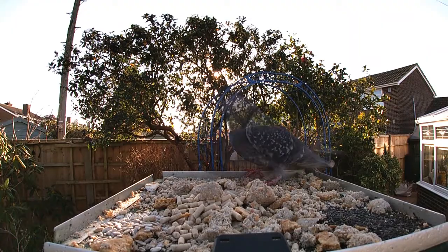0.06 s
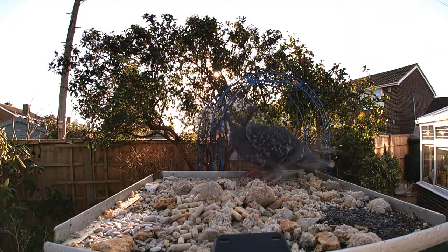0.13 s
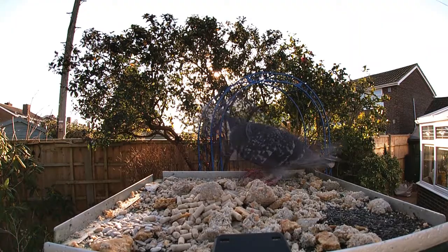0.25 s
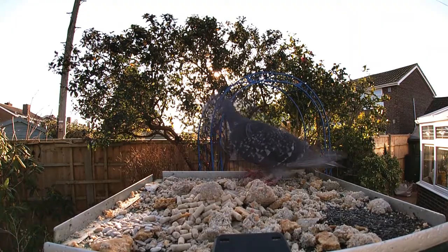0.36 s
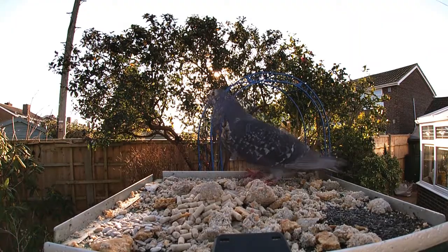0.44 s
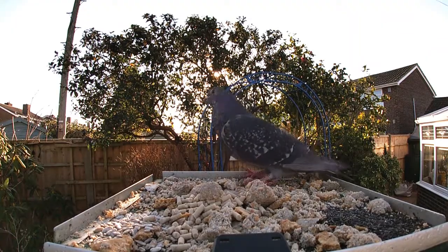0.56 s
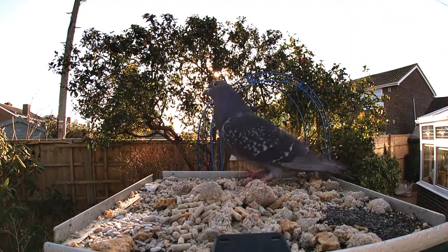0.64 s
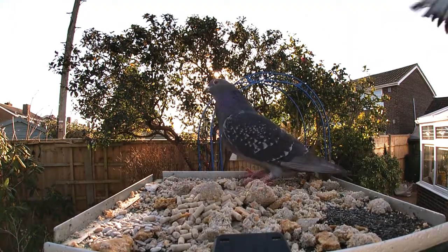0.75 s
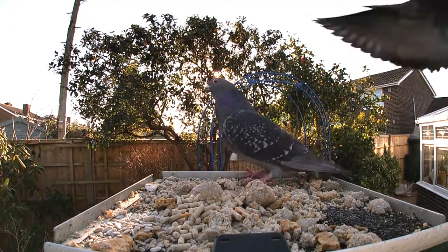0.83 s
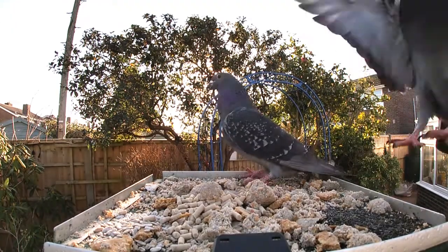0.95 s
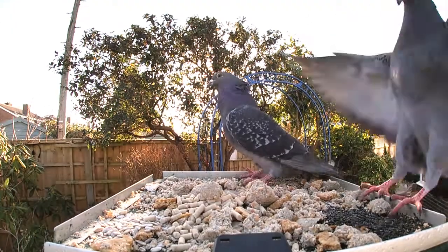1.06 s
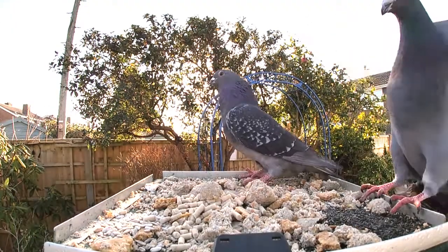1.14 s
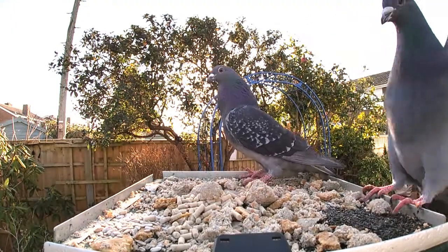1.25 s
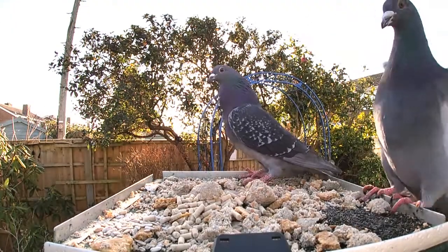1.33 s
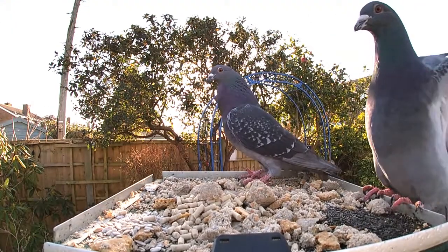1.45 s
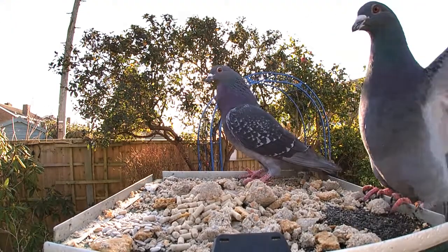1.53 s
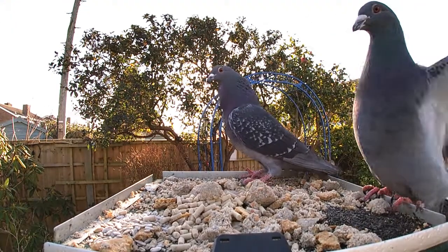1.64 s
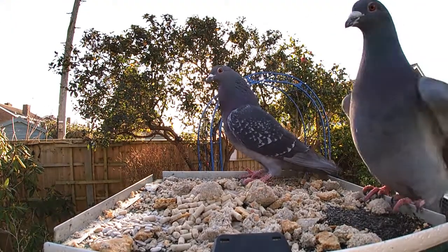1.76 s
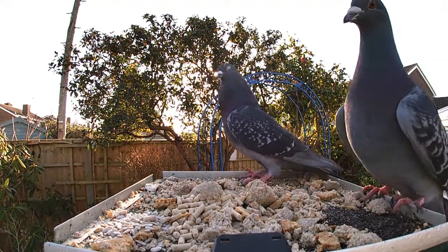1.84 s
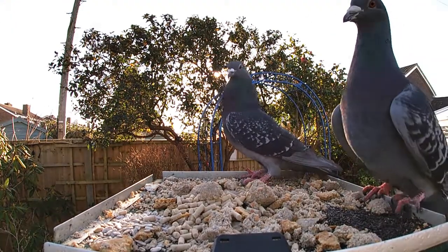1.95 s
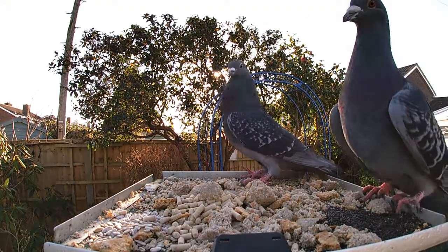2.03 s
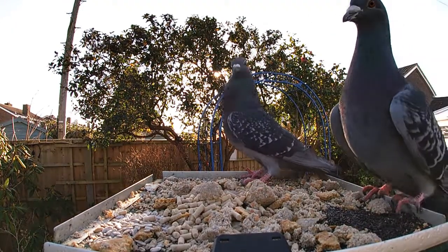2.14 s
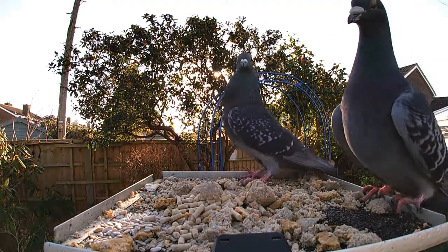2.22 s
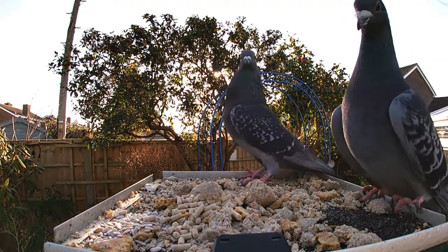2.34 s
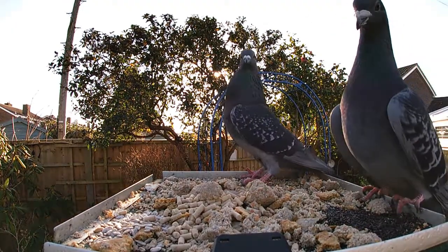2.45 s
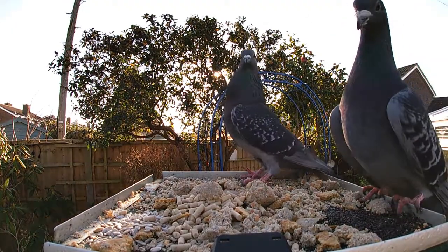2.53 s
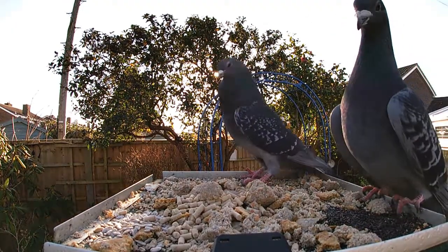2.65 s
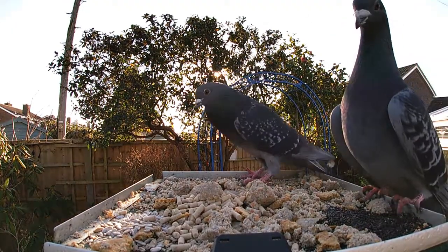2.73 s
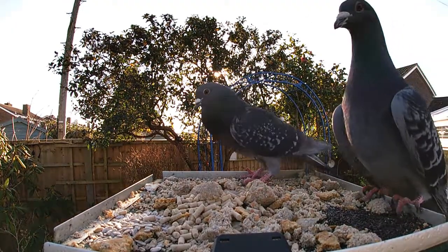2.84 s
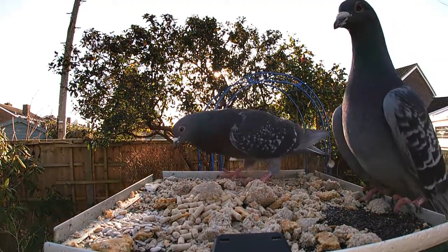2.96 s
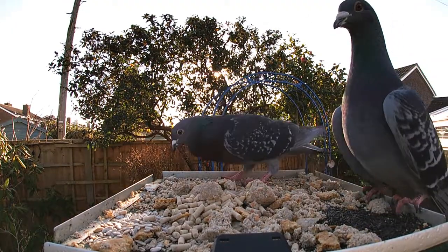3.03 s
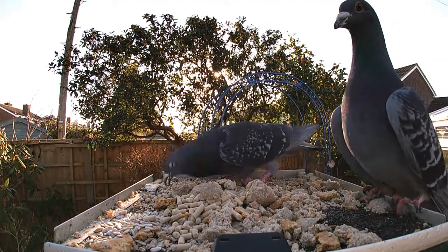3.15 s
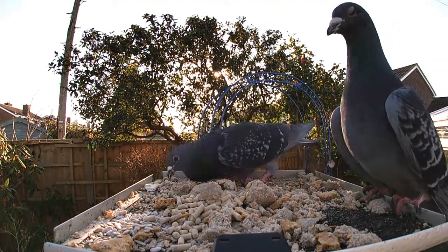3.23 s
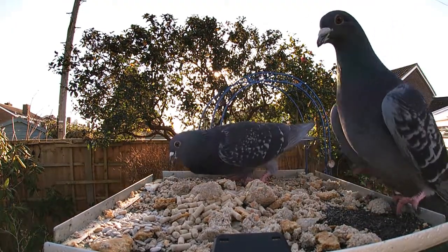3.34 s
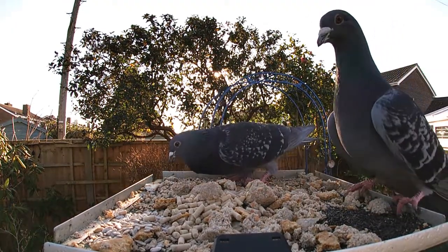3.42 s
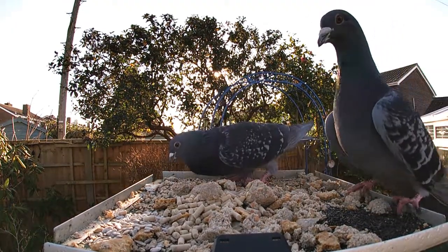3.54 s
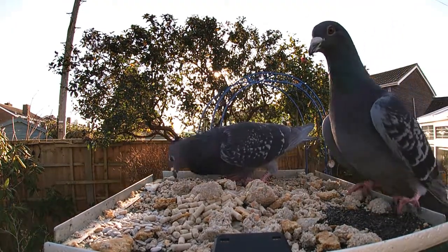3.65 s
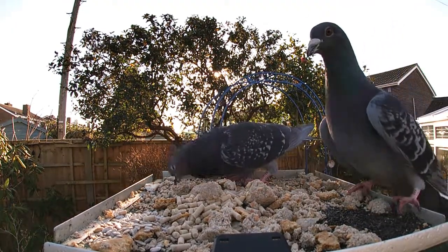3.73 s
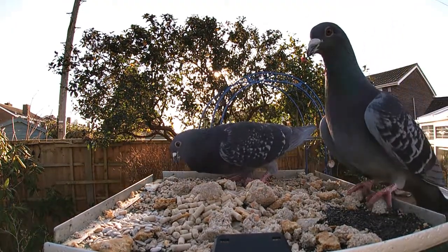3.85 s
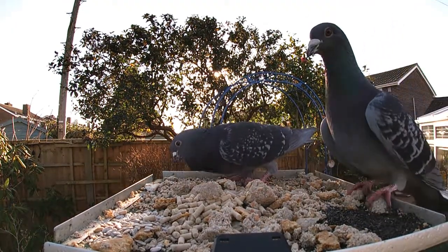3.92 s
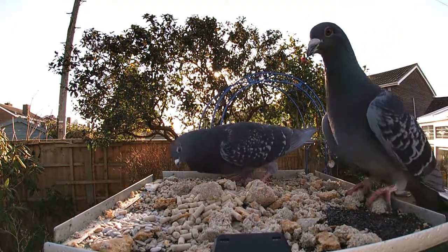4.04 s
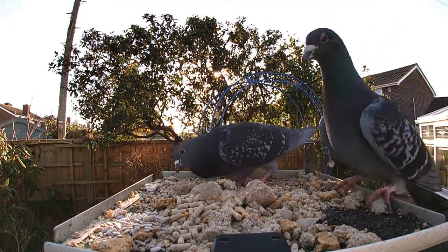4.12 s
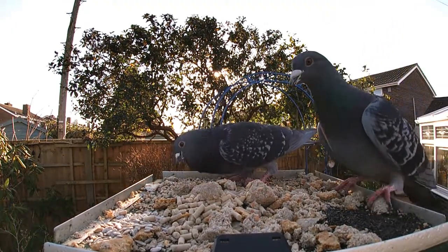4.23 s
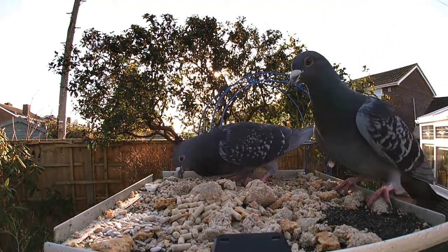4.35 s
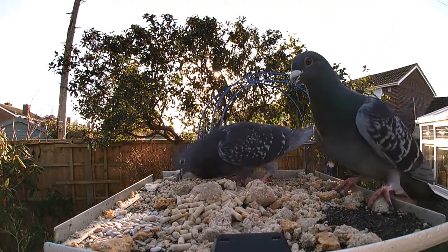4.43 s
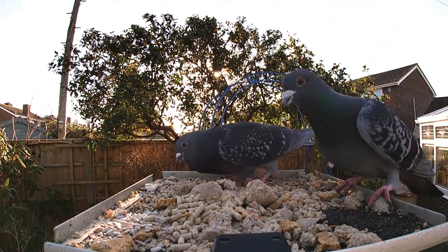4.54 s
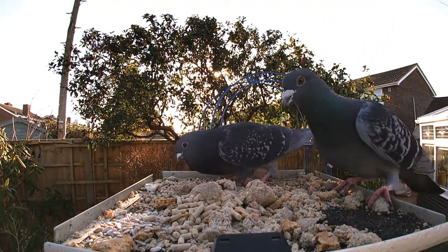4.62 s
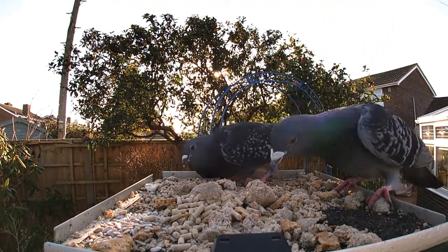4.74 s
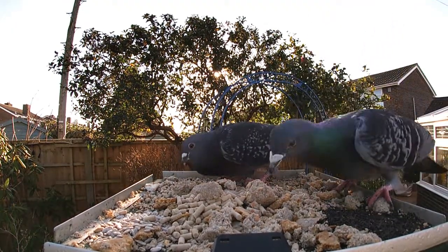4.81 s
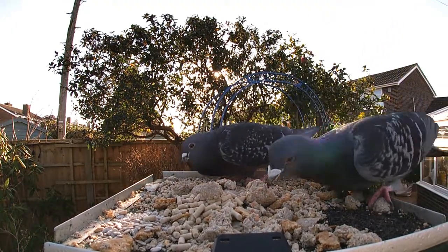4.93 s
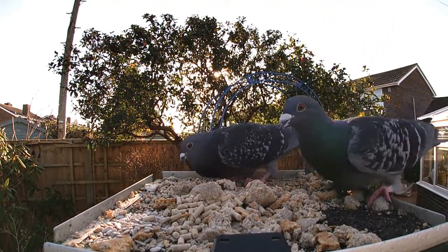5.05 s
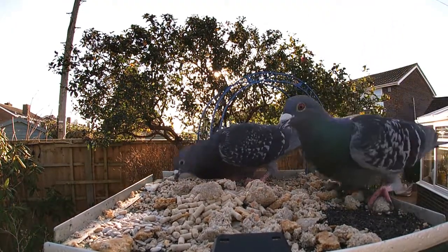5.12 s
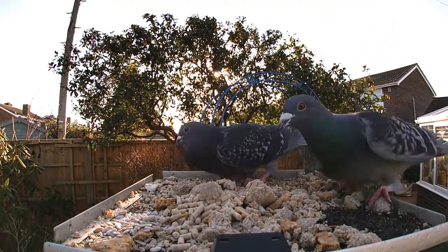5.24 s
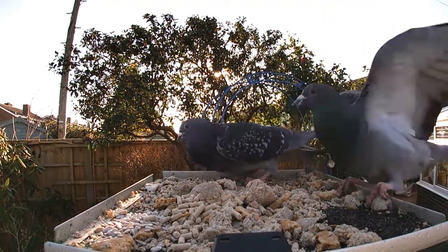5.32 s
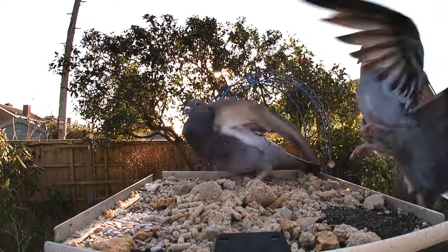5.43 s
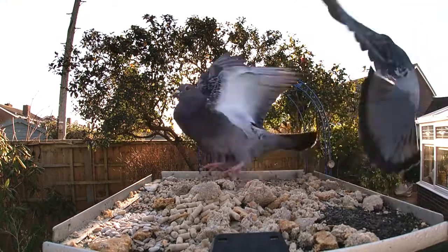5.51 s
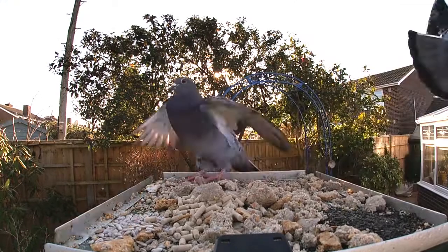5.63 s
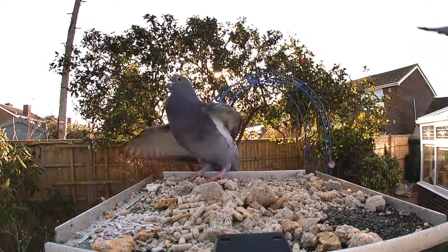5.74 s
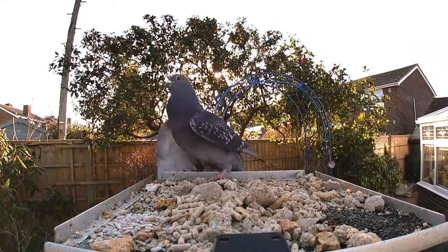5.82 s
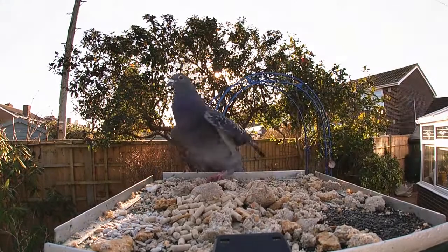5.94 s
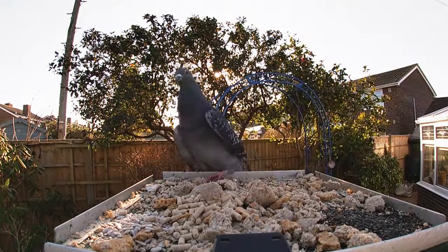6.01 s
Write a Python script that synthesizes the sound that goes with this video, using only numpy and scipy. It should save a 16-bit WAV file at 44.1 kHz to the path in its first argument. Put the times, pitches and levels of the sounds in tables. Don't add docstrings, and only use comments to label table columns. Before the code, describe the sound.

Outdoors in a garden, with the microphone right on a feeding tray: a pigeon's landing flaps grow louder and thump the microphone, then stop. Sparrow-like cheeps, thin whistles and a distant buzzy trill emerge with soft breeze and traffic hum. Sparse footfalls, claw ticks and one hard peck come next, before clattering wings take off, thudding the wood and spilling loose seed.

```python
import sys
import numpy as np
from scipy import signal
from scipy.io import wavfile
from scipy.ndimage import uniform_filter1d

SR = 44100
rng = np.random.default_rng(int(sys.argv[2]) if len(sys.argv) > 2 else 0)


def gain_from_decibels(decibels):
    exponent = np.asarray(decibels, float) / 20
    return 10 ** exponent


def materialize(psi):
    bounded = np.clip(np.atleast_2d(psi).T, -1, 1)
    quanta = np.round(bounded * 32767).astype(np.int16)
    wavfile.write(sys.argv[1], SR, quanta)


N = 267951

# frequency in Hz, level in dB per Hz.
HUM_SPECTRUM = [(60, -40), (115, -10.5), (165, 0.5), (250, -3.5), (705, -17.5), (1500, -26.5), (2200, -33),
                (3600, -33.5), (5200, -33.5), (6500, -43.5), (8000, -60.5), (15500, -88)]
# time in seconds, depth in dB.
DUCKS = [
    (-.01, 8.5),
    (1.45, 17),
    (3.7, 2.6),
    (4.35, 2.2),
    (5.8, 9),
]
OPEN_DB, CLAMP_S, RECOVER_S = -49.5, .3, .9
# peak in seconds, peak in dB, rise and fall in seconds per 20 dB.
WIND = [
    (1.25, -32.5, 1.1, .2),
    (1.7, -61, 3., 3.),
    (2.26, -38, .13, 1.3),
    (3.45, -39.5, .8, 1.1),
    (4.0, -43, .7, .8),
    (5.2, -39, 2.4, .5),
    (5.6, -25.5, .5, .35),
    (5.86, -37, .3, .1),
    (6.0, -58, .3, .9),
]
# time in seconds, peak in dB, frequency in Hz, half length in seconds.
GUSTS = [
    (2.35, -26, 66.1, 0.043),
    (4.017, -35.5, 62.4, .05),
    (5.346, -36.5, 74.8, .07),
]

# start and length in seconds, first and last Hz, level in dB rms.
WHISTLES = [(.3, .055, 7520, 7530, -55), (.325, .045, 5940, 6200, -57), (.385, .04, 7500, 7690, -58),
            (.685, .045, 4830, 4810, -56), (.775, .21, 4450, 4280, -46), (1.155, .12, 7500, 7250, -53),
            (1.26, .06, 5560, 5540, -67), (1.51, .15, 2600, 2650, -58), (1.51, .03, 3560, 3500, -59),
            (1.755, .045, 2180, 2180, -61), (2.1, .29, 9300, 7000, -82), (3.055, .035, 3520, 2550, -50),
            (4.0, .23, 5740, 5830, -62), (4.65, .17, 4370, 4300, -65), (4.775, .09, 2300, 2300, -57),
            (5.09, .05, 4300, 5020, -62), (5.01, .03, 4400, 5200, -62), (2.86, .09, 7400, 7350, -72),
            (2.945, .05, 4450, 5250, -49), (3.615, .055, 5600, 4300, -46), (3.665, .04, 4300, 5200, -55),
            (3.72, .07, 5300, 5150, -58), (3.845, .045, 2830, 2860, -56), (.41, .025, 2950, 2800, -54),
            (.635, .05, 3450, 3650, -50), (2.631, .015, 5950, 6300, -62), (2.853, .016, 6750, 6900, -62),
            (2.94, .06, 4500, 4620, -56), (3.138, .03, 5200, 5250, -50), (2.815, .035, 3300, 3250, -66),
            (3.0, .06, 3850, 3750, -53), (4.495, .15, 5470, 5350, -61), (4.67, .04, 5420, 5350, -61),
            (4.93, .03, 2300, 2350, -61), (3.51, .06, 5950, 5100, -46), (3.7, .09, 2750, 2750, -70),
            (4.43, .2, 5990, 6000, -63), (4.52, .04, 4000, 3950, -59), (4.39, .05, 4300, 4300, -62)]
# start in seconds, pitch in Hz, level in dB rms.
TRILL_STEPS = [(1.56, 3050, -57), (1.6, 3250, -54), (1.618, 4250, -57), (1.63, 3600, -55),
               (1.67, 3800, -53), (1.715, 4600, -57), (1.745, 3650, -56), (1.81, 4250, -58),
               (1.85, 4550, -57), (1.928, 3650, -57)]
# start and length in seconds, first and last Hz, level in dB rms.
QUAVERS = [
    (.583, .106, 2950, 3350, -38),
    (.02, .11, 8000, 7900, -58),
]
# start and length in seconds, first and last Hz, level in dB rms.
WARBLES = [(.411, .065, 5700, 3930, -43), (.445, .055, 5100, 4900, -47), (.472, .04, 5000, 3250, -44),
           (2.62, .05, 2900, 3750, -54), (2.7, .1, 4500, 4880, -49), (3.152, .09, 5800, 5100, -44),
           (2.995, .045, 5250, 5000, -55)]
# start and length in seconds, first and last Hz, level in dB rms.
SWOOPS = [(.579, .012, 4500, 2800, -42), (1.468, .042, 3300, 2280, -62), (.689, .034, 4300, 3720, -42),
          (.724, .032, 4200, 3700, -41), (2.666, .03, 3000, 4150, -53), (3.295, .12, 8900, 6850, -62),
          (3.555, .065, 3500, 4700, -46), (3.81, .04, 2000, 2750, -63)]
# start and length in seconds, first and last Hz, level in dB rms.
DROPS = [(2.105, .057, 7700, 5000, -82), (2.08, .05, 4000, 2870, -59), (3.47, .06, 6150, 5750, -60),
         (3.6, .062, 4700, 4150, -58), (4.55, .048, 3950, 3100, -63), (.735, .065, 3380, 3250, -46),
         (2.385, .03, 7500, 6000, -74)]
# start and length in seconds, first and last Hz, level in dB rms.
SLIDES = [(2.643, .016, 6900, 5200, -64), (2.686, .03, 7750, 5300, -66), (2.771, .011, 6700, 5200, -68),
          (2.818, .024, 7400, 5200, -64), (2.87, .032, 7300, 5200, -66), (4.63, .08, 6000, 5300, -63),
          (4.985, .025, 6500, 3500, -66), (4.975, .05, 7800, 7500, -76), (4.275, .04, 6600, 4300, -67),
          (4.355, .025, 3800, 5000, -64), (3.51, .06, 7500, 6900, -72), (3.015, .025, 3900, 2900, -54)]
# start and length in seconds, foot and top in Hz, level in dB rms.
ARCHES = [(.438, .036, 1800, 2480, -46), (1.698, .04, 1800, 2250, -55), (2.327, .035, 4500, 6800, -70),
          (2.203, .018, 5000, 6000, -70), (2.99, .03, 3300, 3900, -52), (3.062, .02, 2600, 3500, -54),
          (2.15, .035, 2700, 3310, -61), (2.975, .065, 3050, 4260, -47), (3.45, .12, 6900, 7520, -72),
          (3.495, .045, 3700, 5900, -43), (3.93, .05, 3400, 5400, -53), (4.022, .036, 3550, 4480, -53),
          (4.51, .055, 2900, 3900, -55), (4.733, .04, 1800, 2430, -49), (4.59, .03, 2800, 3700, -62)]
# time in seconds, centre and swing in Hz, level in dB rms.
TRILL = [
    (1.53, 2900, 250, -64),
    (1.57, 3200, 400, -55),
    (1.62, 3600, 600, -52.5),
    (1.69, 3910, 600, -50),
    (1.76, 3950, 600, -56),
    (1.85, 3900, 550, -57.5),
    (1.93, 3900, 550, -58),
    (2.06, 3700, 500, -63),
]
# peak in seconds, peak in dB, rise and fall in seconds per 20 dB.
TWITTER = [
    (.1, -66, .3, .2),
    (1.31, -65, .2, .13),
]
STEP_S, STEP_RISE = .03, 1.02
SWOOP_BEND, WARBLE_BEND, DROP_BEND, SLIDE_BEND, ARCH_BEND = 2.6, 8., 3.6, 1.5, 2.8
SHAKE_HZ, SHAKES_PER_S = 140, 58
FADE_DB, WARBLE_FADE_DB = -5, -3
FLOCK_HZ, FLOCK_SPREAD, FLOCK_DB, FLOCK_COUNT = 5700, .06, -15, 280

# time in seconds, # air
# push peak in dB, feather swish in dB.
STROKES = [(.06, -40, -53.5), (.187, -31.5, -51.5), (.312, -28, -46.5), (.441, -22, -41.5),
           (.566, -13.5, -39), (.684, -12, -38.5), (.754, -36, -51.5), (.794, -10, -35), (.864, -30, -45.5),
           (.915, -10, -37), (.99, -34, -44), (1.022, -9.5, -36), (1.059, -9, -56), (1.111, -10.5, -39),
           (1.147, -11, -42), (1.172, -5, -48), (5.475, -11, -35), (5.518, -8.5, -37), (5.543, -10.5, -41)]
# frequency in Hz, level in dB per Hz.
SWISH_SPECTRUM = [(260, -10.5), (378, -2), (1020, -5.5), (1910, -11.5), (3340, -13.5), (4960, -17),
                  (6360, -15), (7620, -22.5), (10400, -29.5), (13800, -44), (15500, -60)]
# peak in seconds, peak in dB, rise and fall in seconds per 20 dB.
RUSTLE = [
    (1.04, -60, 1.5, .08),
    (1.14, -57, .08, .08),
    (1.216, -64, .04, .02),
    (1.26, -77, .1, .1),
    (3.89, -79, .06, .15),
    (4.86, -75, .05, .17),
    (5.32, -65, .07, .5),
    (5.45, -52, .1, .16),
    (5.565, -60, .15, .13),
    (5.9, -85, .5, .45),
]
# time in seconds, low lump in dB, rattle in dB,
# fade in seconds per 20 dB.
BUFFETS = [(1.095, -21, -28.5, 0.05), (1.115, -28, -28.5, 0.02), (1.156, -16, -24, 0.0367),
           (1.165, -17, -17.5, 0.0376), (1.183, -17.5, -21.5, 0.045), (1.228, -33.5, -41, 0.08),
           (1.28, -36, -64, .1), (2.3, -52, -56, .1), (5.478, -26, -25.5, .03), (5.5, -23, -28, .05),
           (5.518, -21, -16.5, 0.0452), (5.535, -23, -21, 0.0349), (5.56, -22, -19, .04),
           (5.583, -19, -26, .04), (5.61, -24, -44, .06), (5.635, -24, -43, 0.04), (5.705, -26, -42, 0.03),
           (5.73, -20, -42, 0.02), (5.775, -30, -53, 0.02), (5.835, -36, -53, .1), (5.885, -38, -54.5, .07)]
# frequency in Hz, level in dB per Hz.
RATTLE_SPECTRUM = [(120, -16), (270, 3), (400, -2), (800, -12.5), (1500, -21.5), (3000, -37.5), (5000, -63),
                   (9000, -100)]
SOFT_PUSH_S, HARDEN_S_PER_DB = .036, .0003

# frequency in Hz, width in Hz, level in dB.
TRAY_MODES = [(1510, 135, 5), (1010, 170, -1.5)]
# frequency in Hz, width in Hz, level in dB.
SEED_MODES = [(2630, 640, 10.5), (4300, 630, 2)]
# frequency in Hz, width in Hz, level in dB.
BRIGHT_MODES = [(6200, 300, 4), (9700, 1600, -15.5)]
# time in seconds, peak in dB, scrape length in seconds.
QUILLS = [(.0676, -40.5, .0044), (1.0973, -33, .003), (1.1992, -36, .004), (1.4144, -57, .0054),
          (1.507, -45, .0035), (3.3922, -40.5, .0029), (3.464, -47, .004), (3.838, -48, .004),
          (3.885, -37, .0045)]
# time in seconds, peak in dB, scrape length in seconds.
SEEDS = [(2.0064, -42, .0049), (2.4076, -38, .0047), (2.428, -44.5, .004), (2.442, -46, .0044),
         (2.9696, -30, .0079), (3.0574, -37, .004), (3.089, -40, .0045), (3.4366, -33.5, .0064),
         (4.2378, -35, .0029), (4.4846, -34.5, .0035), (5.6128, -29, .0051), (5.6276, -34, .003),
         (5.649, -31, .0026), (5.696, -37.5, .0035), (5.731, -32, .004), (5.7546, -20.5, .004),
         (5.795, -42, .004), (5.824, -39, .0075), (5.836, -35, .0071), (5.878, -34, .0064),
         (5.9048, -38, .0062), (6.022, -42, .0052)]
# time in seconds, peak in dB, scrape length in seconds.
CLAWS = [(3.2515, -35, .011), (3.7984, -40, .0055), (4.1463, -40, .011), (4.458, -41, .008),
         (4.768, -37, .012), (5.011, -45, .0045), (5.2134, -35, .016), (5.2747, -37, .0029),
         (5.328, -33, .003), (5.8625, -39, .0086)]
# time in seconds, peak in dB, scrape length in seconds, tray ring in dB,
# bright ring in dB.
SLAPS = [
    (4.1807, -21.5, .0016, -30, -21),
    (5.4217, -23.5, .008, -4, -14),
    (5.4274, -20, .0055, 7, -19),
    (5.473, -17, .003, -8, -20.5),
    (5.4905, -30, .004, 8, -4),
    (5.4956, -16, .004, 6, 3),
    (5.5166, -16, .005, -3, -30),
]
SEED_DB, CLAW_DB, QUILL_DB = (-20, -38), (-1, -27), (-8, -12)
# time in seconds, peak in dB, frequency in Hz, overtone in dB.
STEPS = [
    (2.014, -38.5, 318, -13),
    (2.821, -35.5, 219, -18),
    (3.4345, -21.5, 300, 3),
    (3.4425, -24, 255, -8),
    (3.426, -35, 370, 8),
    (3.891, -28, 280, -18),
    (4.179, -36, 336, -15),
    (4.149, -35, 330, -18),
]

# time in seconds, peak in dB, frequency in Hz,
# scrape length in seconds.
PINGS = [(1.0965, -26, 4600, .003), (1.0965, -33, 6700, .002), (1.199, -34, 3100, .002),
         (1.325, -56, 2300, .002), (1.355, -56, 3700, .002), (1.381, -57, 4400, .002),
         (3.086, -54, 6800, .003), (3.103, -59, 6800, .003), (3.68, -50, 2800, .003),
         (3.754, -60, 6800, .004), (3.836, -62, 9500, .005), (3.869, -50, 6200, .006),
         (3.901, -48, 6900, .004), (5.29, -55, 9700, .006), (5.312, -51, 9700, .004),
         (5.4055, -44, 9800, .002), (5.4269, -35, 9900, .008), (5.4269, -53, 13500, .008),
         (5.4738, -26, 9800, .006), (5.4738, -42, 13800, .004), (5.4735, -23, 4300, .001),
         (5.481, -32, 2300, .006), (5.517, -20, 1900, .004), (5.461, -28, 1450, .005),
         (5.503, -20, 1500, .008), (5.429, -22, 1000, .012), (5.428, -26, 4200, .008),
         (4.263, -43, 700, .004), (5.49, -36, 10000, .003), (5.49, -52, 13500, .003),
         (5.4958, -31, 9700, .003), (5.5172, -33, 9300, .003), (5.5285, -54, 13500, .001),
         (5.534, -48, 11500, .001), (5.571, -52, 11000, .001), (5.613, -43, 9800, .002),
         (5.627, -26, 2450, .003), (5.771, -42, 3000, .003), (5.795, -42, 3300, .004),
         (5.808, -50, 6000, .005), (5.835, -35, 2400, .008), (5.906, -39, 3100, .01),
         (5.968, -48, 2800, .004), (6.07, -46, 2500, .004)]
# time in seconds, peak in dB, frequency in Hz.
THUDS = [(1.087, -22, 230), (1.157, -3, 120), (1.1815, -12, 210), (1.191, -13, 230), (5.4735, -12, 520),
         (2.3, -46, 300), (5.501, -7, 80), (5.522, -2, 210), (5.5315, -12, 290), (5.5665, -7, 280),
         (5.585, -3.5, 160), (5.607, -15, 130), (5.706, -24, 150), (5.716, -17, 70), (5.7325, -18, 170),
         (5.743, -24, 110)]
PING_WIDTH, THUD_WIDTH = .14, .45

# peak in seconds, peak in dB, rise and fall in seconds per 20 dB.
RUMBLE = [
    (2.33, -47, .2, .2),
    (4.38, -49, .2, .5),
    (5.3, -41, 1.1, .2),
]
# peak in seconds, peak in dB, rise and fall in seconds per
# 20 dB.
FLURRIES = [
    (2.6, -62, .08, .1),
    (3.256, -58, .008, .14),
    (3.91, -58, .05, .12),
    (4.86, -56, .04, .12),
    (4.97, -62, .1, .2),
]
# peak in seconds, peak in dB, rise and fall in seconds per 20 dB.
SCATTER = [
    (3.92, -61, .1, .2),
    (4.87, -57, .07, .4),
    (5.64, -47, .1, .12),
    (5.845, -48, .06, .05),
    (5.91, -52, .03, .05),
    (6.07, -63, .3, .1),
]
TUMBLES_PER_S = 1500
HISS_DB = -94


def evened(x):
    return x / np.sqrt(np.mean(x ** 2) + 1e-20)


def add(mix, s, sound):
    part = mix[max(round(s * SR), 0):][:len(sound)]
    part += sound[:len(part)]


def passed(x, hz, kind, order):
    return signal.sosfilt(signal.butter(order, hz, kind, fs=SR, output="sos"), x)


def smoothed(x, first, second):
    return uniform_filter1d(uniform_filter1d(x, size=first), size=second)


def level(rows):
    t = np.arange(0, N / SR, .001)
    power = 0
    for s, db, rise, fall in rows:
        away = np.where(t < s, (s - t) / rise, (t - s) / fall)
        power = power + gain_from_decibels(db - 20 * away) ** 2
    return np.interp(np.arange(N) / SR, t, np.sqrt(power))


def noise(spectrum, lo_hz, hi_hz, patchy_db=0.):
    hz = np.fft.rfftfreq(1024, 1 / SR)
    f, db = np.transpose(spectrum)
    a, b, patches = rng.standard_normal((N // 256 + 5, 513, 3)).T
    patches = uniform_filter1d(patches, size=10, axis=0)
    patches = evened(uniform_filter1d(patches, size=12, axis=1))
    shape = gain_from_decibels(np.interp(np.log(hz + 1), np.log(f + 1), db, -120, -120))
    band = (hz > lo_hz) & (hz < hi_hz)
    cells = (a + 1j * b) * shape[:, None] * gain_from_decibels(patchy_db * patches)
    x = signal.istft(cells, nperseg=1024, noverlap=768)[1][:N]
    return evened(x) * np.sqrt(np.sum(shape ** 2) / np.sum(shape[band] ** 2))


def lumps(lo_hz, hi_hz):
    return evened(passed(rng.standard_normal(N), [lo_hz, hi_hz], "band", order=3))


def flicker(width_s, depth_db):
    wander = evened(smoothed(rng.standard_normal(N), int(width_s * SR), 40))
    return evened(gain_from_decibels(depth_db * wander))


def ring(x, modes):
    t = np.arange(SR // 20) / SR
    response = sum(gain_from_decibels(db) * np.exp(-np.pi * w * t) * np.sin(2 * np.pi * hz * t) for hz, w, db in modes)
    y = signal.fftconvolve(x, response)
    return y / abs(y).max()


def background():
    t = np.arange(N) / SR
    depth = 0
    for s, db in DUCKS:
        closing = np.clip(1 + (t - s) / CLAMP_S, 0, 1)
        depth = depth + db * closing * np.exp(-np.maximum(t - s, 0) / RECOVER_S)
    return gain_from_decibels(OPEN_DB - depth)


def garden():
    t = np.arange(N) / SR
    gusts = np.zeros(N)
    for s, db, hz, half in GUSTS:
        gusts += gain_from_decibels(db) * np.exp(-((t - s) / half) ** 2) * np.sin(2 * np.pi * hz * t)
    breeze = level(WIND) * lumps(22, 69) * flicker(0.073, 1.6)
    hum = gain_from_decibels(1.5) * background() * noise(HUM_SPECTRUM, 300, 1200, patchy_db=1.27)
    return hum + breeze + gusts


def straight(u):
    return u


def arch(u):
    return 1 - abs(2 * u - 1) ** ARCH_BEND


def whistled(rows, shape, swing=0., fade_db=FADE_DB, drift_hz=0.):
    out = np.zeros(N)
    drift = drift_hz * lumps(12, 70) if drift_hz else np.zeros(N)
    for s, length, from_hz, to_hz, db in rows:
        t = np.arange(0, length, 1 / SR)
        u = t / length
        shake = swing * np.sin(2 * np.pi * SHAKES_PER_S * t)
        hz = from_hz + (to_hz - from_hz) * shape(u) + shake + drift[round(s * SR):][:len(t)]
        tone = np.sin(2 * np.pi * np.cumsum(hz) / SR)
        add(out, s, gain_from_decibels(db + 3.0 + fade_db * u) * tone * signal.windows.tukey(len(t), .22))
    return out


def flock():
    s, length, pitch, size = rng.random((FLOCK_COUNT, 4)).T
    top = FLOCK_HZ * (1 + FLOCK_SPREAD * (2 * pitch - 1) * 2)
    rows = zip(s * (N / SR - .1), .02 + .04 * length, .8 * top, top, FLOCK_DB - 9 * size)
    return background() * whistled(rows, arch)


def trill():
    s, *columns = np.transpose(TRILL)
    t = np.arange(s[0], s[-1], 1 / SR)
    hz, swing, db = (np.interp(t, s, c) for c in columns)
    unsteady = evened(uniform_filter1d(rng.standard_normal(N), size=500))[:len(t)]
    slur = np.cumsum(75 + 30 * unsteady) / SR % 1
    tone = np.sin(2 * np.pi * np.cumsum(hz + 1.52 * swing * (2 * slur - 1)) / SR)
    out = np.zeros(N)
    add(out, s[0], gain_from_decibels(db + 3.7) * np.sin(np.pi * slur) * tone)
    return out


def echoed(sounds):
    t = np.arange(SR) / SR
    taps = rng.standard_normal(SR) * (rng.random(SR) < .05) * (t > .004)
    tail = taps * gain_from_decibels(-60 * t / 0.21) + passed(taps * gain_from_decibels(-16 - 60 * t / 1.17), 5600, "low", order=3)
    return signal.fftconvolve(np.array(sounds), tail[None] / np.linalg.norm(tail), axes=1)[:, :N]


def songbirds():
    steps = [(s, STEP_S, hz, STEP_RISE * hz, db) for s, hz, db in TRILL_STEPS]
    dry = whistled(WHISTLES + steps, straight, drift_hz=30.)
    burr = 1 + 0.24 * lumps(40, 387)
    dry *= gain_from_decibels(3.0 * evened(passed(burr - 1, 85, "low", order=2)) - 1.2)
    dry += whistled(QUAVERS, straight, swing=110., fade_db=-2.5)
    dry += whistled(WARBLES, lambda u: 1 - (1 - u) ** WARBLE_BEND, SHAKE_HZ, WARBLE_FADE_DB)
    clean = whistled(SWOOPS, lambda u: 1 - (1 - u) ** SWOOP_BEND, fade_db=-1.5)
    clean += whistled(DROPS, lambda u: u ** DROP_BEND, fade_db=1.5)
    clean += whistled(SLIDES, lambda u: u ** SLIDE_BEND, fade_db=-1.5)
    clean += whistled(ARCHES, arch, fade_db=-1.5)
    far = trill()
    near_echo, far_echo = echoed([burr * dry + gain_from_decibels(-2.5) * clean, burr * far + flock()])
    ducked = np.minimum(background() / gain_from_decibels(-59), 1) ** 1.1
    direct = burr * (dry + gain_from_decibels(-5) * far) + gain_from_decibels(-1.5) * clean
    echoes = gain_from_decibels(-1.2) * ducked * near_echo + gain_from_decibels(-.3) * far_echo
    twitter = level(TWITTER) * lumps(6800, 8200) * flicker(.012, 2.5)
    return twitter + passed(direct + echoes, 7200, "low", order=3)


def wings():
    push, gate, low, high = np.zeros((4, N))
    near = np.arange(SR // 10) / SR - 1 / 20
    for s, push_db, swish_db in STROKES:
        u = near / (0.23 * (SOFT_PUSH_S - HARDEN_S_PER_DB * (push_db + 40)))
        strength, spread = np.where(u < 0, 2.1, 1.3), np.where(u < 0, 2.2, 2.6)
        add(push, s + near[0], gain_from_decibels(push_db) * u * strength * np.exp(-u ** 2 / spread))
        add(gate, s + near[0], gain_from_decibels(swish_db) * np.exp(-((near + .011) / 0.013) ** 2))
    push = passed(push, 10, "high", order=1)
    low += gain_from_decibels(5.5) * gate
    age = np.arange(SR // 2) / SR
    for s, low_db, rattle_db, fade in BUFFETS:
        add(low, s - .004, gain_from_decibels(low_db + 1.5 - 20 * age / fade) * np.minimum(age / .006, 1))
        add(high, s, gain_from_decibels(rattle_db + 0.26 - 20 * age / (0.68 * fade)) * np.minimum(age / 0.0019, 1))
    feathers = gain_from_decibels(1.5) * gate * noise(SWISH_SPECTRUM, 330, 15000) * flicker(.002, 3.0)
    thin = passed(noise(SWISH_SPECTRUM, 7740, 11000, patchy_db=2.5), 1900, "high", order=1)
    rustle = level(RUSTLE) * thin * flicker(0.0035, 2.0)
    wash = low * lumps(55, 120) + high * noise(RATTLE_SPECTRUM, 420, 1200) * flicker(.004, 2.2)
    return push + feathers + rustle + wash


def tray():
    ticks, steps = np.zeros((2, N))
    t = np.arange(SR // 20) / SR
    kinds = [(SEEDS, SEED_DB), (QUILLS, QUILL_DB), (CLAWS, CLAW_DB)]
    rows = SLAPS + [row + kind for table, kind in kinds for row in table]
    for s, db, length, tray_db, bright_db in rows:
        grit = rng.standard_normal(SR // 20)
        slips = grit * abs(grit) * np.exp(-t / np.clip(0.64 * length, .0004, .012)) * np.minimum(t / .0022, 1)
        size = 1 + 0.082 * grit[0]
        tick = ring(slips, [(hz * size, width, mode_db) for hz, width, mode_db in SEED_MODES])
        tick = tick + gain_from_decibels(tray_db) * ring(slips, TRAY_MODES) + gain_from_decibels(bright_db) * ring(slips, BRIGHT_MODES)
        add(ticks, s, gain_from_decibels(db - 0.44) * tick)
    for s, db, hz, over_db in STEPS:
        add(steps, s, gain_from_decibels(db) * ring(np.hanning(40), [(hz, 30, 0), (2.2 * hz, 160, over_db)]))
    return steps + passed(passed(ticks, 6700, "low", order=5), 480, "high", order=2)


def knocks():
    out, t = np.zeros(N), np.arange(SR // 20) / SR
    for s, db, hz, length in PINGS:
        grit = rng.standard_normal(SR // 20)
        scrape = grit * np.exp(-t / np.clip(.6 * length, .0003, .012)) * np.minimum(t / .0008, 1)
        ping = ring(scrape, [(hz, PING_WIDTH * hz, 0)])
        add(out, s, gain_from_decibels(db) * ring(ping, [(hz, 2 * PING_WIDTH * hz, 0)]))
    for s, db, hz in THUDS:
        add(out, s, gain_from_decibels(db) * ring(np.hanning(80), [(hz, THUD_WIDTH * hz, 0)]))
    return out


def rumble():
    return level(RUMBLE) * lumps(85, 190) * flicker(.03, 2.2)


def flurries():
    return level(FLURRIES) * lumps(4200, 7000) * flicker(.008, 4.0)


def scatter():
    hits = rng.random(N) < TUMBLES_PER_S / SR
    drive = rng.standard_normal(N) * gain_from_decibels(2.4 * rng.exponential(1, N)) * hits
    tumbling = passed(ring(drive, SEED_MODES)[:N], [1900, 4800], "band", order=3)
    return level(SCATTER) * evened(tumbling)


def scene():
    hiss = gain_from_decibels(HISS_DB) * lumps(6500, 10800)
    far = garden() + songbirds() + flurries()
    bird = wings() + tray() + knocks() + rumble() + scatter()
    return (hiss + far + bird)[None]


def top_cut(x):
    return signal.sosfilt(signal.butter(12, 15400, fs=SR, output="sos"), x)


def record(dry):
    mix = np.tanh(dry / 1.572) * 1.639
    return top_cut(mix)


dry = scene()
out = record(dry)
materialize(out)
```